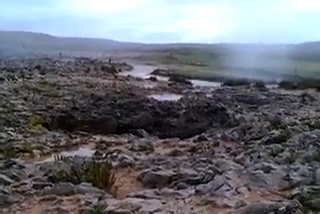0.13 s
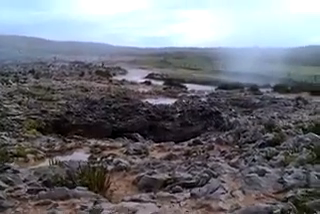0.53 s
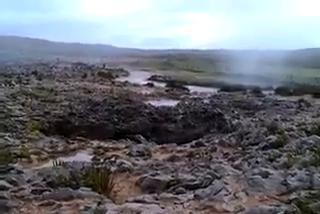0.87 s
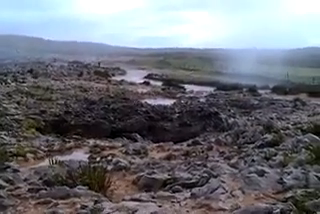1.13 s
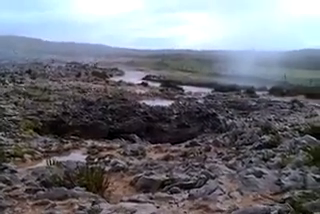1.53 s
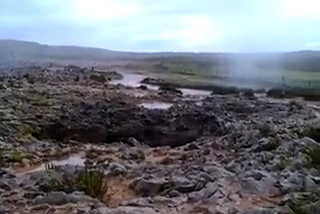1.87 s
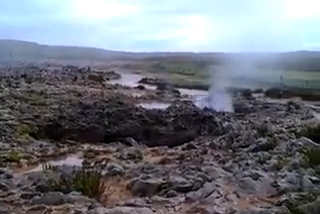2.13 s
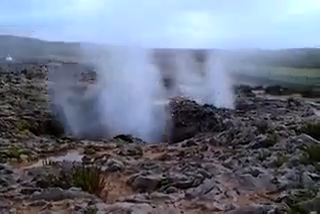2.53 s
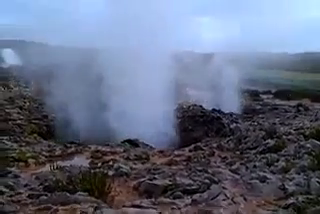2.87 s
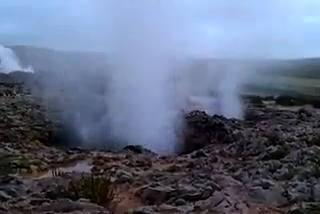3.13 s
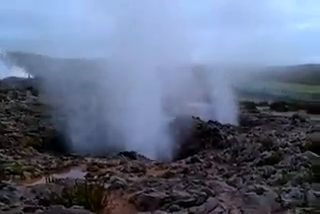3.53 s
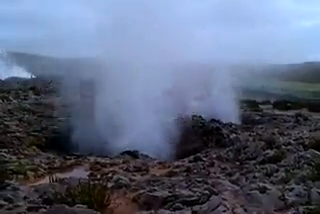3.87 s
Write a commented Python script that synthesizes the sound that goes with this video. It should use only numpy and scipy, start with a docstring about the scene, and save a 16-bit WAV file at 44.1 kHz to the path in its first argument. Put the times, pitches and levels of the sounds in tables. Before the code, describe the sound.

Low surf and wind, then spray bursts from rock blowholes with a roaring hiss.

```python
"""Distant surf washes steadily on a rocky coast, small waves slap and wind buffets the microphone.
A swell fills a cave under the rock: a deep rumble grows, and trapped air roars and booms in the throats
of the blowholes. Air and spray rush out in a loud turbulent hiss, coloured by its reflection off the
rock shelf. One mouth rings briefly, a cleft adds a narrow band of hiss, and the jets ease as the
swell sinks."""
import sys
import numpy as np
from scipy import signal
from scipy.fft import rfft, irfft
from scipy.io import wavfile

SR = 44100
rng = np.random.default_rng(int(sys.argv[2]) if len(sys.argv) > 2 else 0)


def put_to_file(sound):
    """Save the sound as 16-bit audio at rate SR, in the file named by the first command-line argument."""
    columns = np.atleast_2d(sound).T  # one column per channel
    safe = np.clip(columns, -1, 1)
    whole_steps = np.round(safe * 32767)
    wavfile.write(sys.argv[1], SR, whole_steps.astype(np.int16))


N = 176400
TIME = np.arange(N) / SR
FREQS = np.maximum(np.arange(N // 2 + 1) * SR / N, 1)

# envelope of the distant surf: time_s, relative_level_db
SURF_ENVELOPE = [(0.0, -47.5), (.7, -46), (1.15, -44.5), (1.35, -44), (1.5, -45.5), (1.8, -44.5),
                 (2.1, -43)]
# spectrum of the surf: frequency_hz, relative_gain_db
SURF_SPECTRUM = [(100, -0.5), (450, 0.5), (600, -0.5), (1050, 0.5), (1350, 0), (1800, 0.2), (2350, -2),
                 (3000, -6), (3800, -5.5), (5000, -8.5), (5650, -4), (6150, -8), (6700, -10), (7400, -18.5),
                 (8700, -25.5), (9600, -48), (15000, -61)]
# envelope of foam draining over the rocks: time_s, level_db
FOAM_ENVELOPE = [(0.0, -55.5), (.4, -55), (.65, -52.5), (1.08, -47.5), (1.45, -51), (1.8, -51),
                 (2.02, -47.5), (2.3, -50)]
# envelope of the wind on the microphone: time_s, relative_level_db
WIND_ENVELOPE = [(0.0, -43.5), (.26, -43.5), (.44, -44), (.6, -41.5), (.69, -40), (.79, -37.5), (.85, -46),
                 (.99, -37), (1.07, -42), (1.13, -38.5), (1.25, -39.5), (1.32, -34), (1.41, -35.5),
                 (1.51, -42.5), (1.62, -38), (1.75, -44.5)]
# spectrum of the wind: frequency_hz, relative_gain_db
WIND_SPECTRUM = [(20, -4), (50, -4.5), (100, -0.5), (150, -1), (220, -6.5), (300, -11.5), (420, -22.5),
                 (800, -49)]
# small waves slapping the rocks: centre_s, level_db
WAVE_SLAPS = [(.108, -42.5), (.247, -37.5), (.462, -43.5)]
# single eddies striking the microphone: centre_s, peak_db
EDDIES = [(.652, -31), (0.725, -21.5), (0.7953, -26.5), (1.127, -28.5), (1.315, -30), (1.6065, -25),
          (2.062, -27), (2.376, -17), (3.803, -19), (3.838, -26)]
# envelope of the swell's rumble in the cave: time_s, relative_level_db
RUMBLE_ENVELOPE = [(1.75, -37.5), (1.83, -36), (2.0, -34.5), (2.11, -35), (2.19, -27), (2.27, -30.5),
                   (2.38, -23), (2.46, -28.5), (2.75, -28.5), (3.02, -24.5), (3.22, -26), (3.35, -28.5),
                   (3.47, -27), (3.59, -28), (3.68, -26.5), (3.73, -28), (3.8, -24), (3.87, -29),
                   (4.0, -27)]
# spectrum of the rumble: frequency_hz, relative_gain_db
RUMBLE_SPECTRUM = [(20, -8.5), (40, -4), (65, 3.5), (85, -0.5), (108, 4), (130, -2.5), (175, -2.5),
                   (240, -11), (400, -34)]
# envelope of the roar in the throats of the holes: time_s, relative_level_db
THROAT_ENVELOPE = [(1.85, -46.5), (2.0, -37.5), (2.1, -37), (2.28, -32.5), (2.34, -27), (2.52, -24),
                   (2.68, -22.5), (2.82, -21), (2.92, -25.5), (3.2, -26.5), (3.47, -27), (3.6, -31.5),
                   (3.8, -29.5), (4.0, -39)]
# spectrum of the roar: nominal_frequency_hz, relative_gain_db
THROAT_SPECTRUM = [(90, -5.5), (150, -5), (200, -2.5), (255, 0), (310, -4.5), (385, -15), (480, -20),
                   (650, -37), (1200, -52)]
# envelope of the jets of air and spray: time_s, relative_level_db
JET_ENVELOPE = [(2.2, -47), (2.35, -36), (2.46, -32), (2.54, -29), (2.66, -29), (2.77, -28.3), (2.92, -30),
                (3.14, -30.3), (3.28, -32.5), (3.49, -32), (3.66, -38), (3.88, -43), (4.0, -40.5)]
# spectrum of the jets at full strength: frequency_hz, relative_gain_db
JET_SPECTRUM = [(200, -16), (480, -1), (600, -1), (750, 2), (1000, 0.5), (1350, -3), (1900, 1.8),
                (2700, 1.7), (3600, -0.5), (4600, -2), (5300, -2), (6400, -6.5), (8200, -8.5),
                (8700, -16.5), (9150, -29), (9900, -16.5), (11000, -16.5), (12800, -27.5), (15000, -47)]
# blasts of trapped air in the cave: centre_s, peak_db, pitch_hz
AIR_BLASTS = [(2.545, -17.5, 195.6), (2.595, -17, 250), (2.655, -15.5, 180.4), (2.732, -16.5, 255),
              (2.982, -23, 171.7), (3.46, -23.5, 195)]

SURF_TRIM_DB, WIND_TRIM_DB, RUMBLE_TRIM_DB, THROAT_TRIM_DB, JET_TRIM_DB = 4, 0.97, 0.2, -0.5, 0.96
CAVE_ONSET_DB_PER_S, JET_ONSET_DB_PER_S = 75, 320
TILT_PIVOT_HZ = 4030


def from_db(db):
    """Amplitude grows tenfold for every 20 dB."""
    return 10 ** (np.asarray(db) / 20)


def envelope_db(rows, onset_db_per_s=0):
    """Linear interpolation of level, with an optional rise up to the first point."""
    return np.interp(TIME, *np.transpose(rows)) - onset_db_per_s * np.maximum(rows[0][0] - TIME, 0)


def spectral_gain(spectrum):
    """A filter response interpolated in log frequency, rolling off beyond both ends."""
    hz, db = np.transpose(spectrum)
    skirts = 1 / np.sqrt((1 + (hz[0] / FREQS / 2) ** 4) * (1 + (FREQS / hz[-1] / 2) ** 4))
    return from_db(np.interp(np.log(FREQS), np.log(hz), db)) * skirts


def resonance(hz, half_width_hz):
    """The Lorentzian peak of a single resonance, as gain against frequency."""
    return 1 / (1 + ((FREQS - hz) / half_width_hz) ** 2)


def bursts(rows, sigma_s):
    """Superposed Gaussian envelopes, one for each (centre_s, level_db) row."""
    return sum(from_db(db) * np.exp(-.5 * ((TIME - centre_s) / sigma_s) ** 2) for centre_s, db in rows)


def filtered(source, gain):
    """Filtering multiplies the spectrum by a gain; the result is scaled to unit rms."""
    shaped = irfft(rfft(source) * gain, N)
    return shaped / np.sqrt(np.mean(shaped ** 2) + 1e-20)


def noise(gain):
    """White noise takes on the spectrum of its filter; unit rms."""
    return filtered(rng.standard_normal(N), gain)


def drift(rate_hz):
    """Low-pass noise gives a slow random fluctuation of unit rms."""
    return noise((FREQS > 3) / (1 + (FREQS / rate_hz) ** 2))


def turbulence(spectrum, flicker_db, surge_db, rate_hz, tilt_db_per_octave=0):
    """Amplitude modulation of noise: half-octave bands surge together and flicker separately."""
    carrier = rfft(noise(spectral_gain(spectrum)))
    common_db = surge_db * drift(rate_hz)
    band_position = np.maximum(2 * np.log2(FREQS / 20), 0)
    out = np.zeros(N)
    for k in range(int(2 * np.log2(spectrum[-1][0] / 20)) + 3):
        band = irfft(carrier * np.maximum(1 - abs(band_position - k), 0), N)
        octaves_above = max(np.log2(20 * 2 ** (k / 2) / TILT_PIVOT_HZ), 0)
        out += band * from_db(common_db + flicker_db * drift(rate_hz) + tilt_db_per_octave * octaves_above)
    return out


def surf():
    """Far breakers add incoherently to an even wash; draining foam adds a band of hiss."""
    wash = turbulence(SURF_SPECTRUM, flicker_db=0.33, surge_db=0.44, rate_hz=5.5)
    foam = noise(resonance(hz=5910, half_width_hz=860) ** 2)
    wash_gain = from_db(SURF_TRIM_DB + envelope_db(SURF_ENVELOPE))
    return wash_gain * wash + from_db(envelope_db(FOAM_ENVELOPE)) * foam


def wind():
    """Turbulent pressure fluctuations on the microphone make a lumpy low noise."""
    pressure = turbulence(WIND_SPECTRUM, flicker_db=0.3, surge_db=1.0, rate_hz=42)
    return from_db(WIND_TRIM_DB + envelope_db(WIND_ENVELOPE)) * pressure


def slaps():
    """The impact of a small wave on rock is a dull noise burst with a hollow resonance."""
    low_pass = 1 / np.hypot(1, (FREQS / 2600) ** 2)
    body = resonance(hz=520, half_width_hz=150)
    return bursts(WAVE_SLAPS, sigma_s=0.011) * noise(spectral_gain(SURF_SPECTRUM) * low_pass + body)


def buffets(sigma_s=0.0015):
    """Each strong eddy is a brief dip in pressure that thumps the microphone."""
    pressure = np.zeros(N)
    for centre_s, peak_db in EDDIES:
        offset_squared = ((TIME - centre_s) / sigma_s) ** 2
        pressure -= from_db(peak_db) * (1 - offset_squared) * np.exp(-offset_squared / 2)
    return pressure


def cave_rumble():
    """The swell excites the cave with noise that peaks at a few low frequencies."""
    rumble = turbulence(RUMBLE_SPECTRUM, flicker_db=-0.6, surge_db=-0.84, rate_hz=34)
    return from_db(RUMBLE_TRIM_DB + envelope_db(RUMBLE_ENVELOPE, CAVE_ONSET_DB_PER_S)) * rumble


def throat_roar(pitch_fall_per_db=0.0035, pivot_db=-25.5):
    """Turbulent flow roars in the throats; its spectrum shifts slightly down as it grows louder."""
    pitch_ratio = 1 - pitch_fall_per_db * (envelope_db(THROAT_ENVELOPE) - pivot_db)
    flow = turbulence(THROAT_SPECTRUM, flicker_db=0.2, surge_db=1.07, rate_hz=55)
    roar = np.interp(np.cumsum(pitch_ratio) / SR, TIME, flow, period=N / SR)
    return from_db(THROAT_TRIM_DB + envelope_db(THROAT_ENVELOPE, CAVE_ONSET_DB_PER_S)) * roar


def jets(dulling_db_per_octave_per_db=0.018, spray_db=-13.5, echo_s=0.001176, echo_gain=0.1):
    """Jet noise, brighter when stronger, interferes with its reflection off the rock shelf."""
    level_db = envelope_db(JET_ENVELOPE, JET_ONSET_DB_PER_S)
    tilt = dulling_db_per_octave_per_db * np.maximum(level_db - level_db.max(), -20)
    hiss = turbulence(JET_SPECTRUM, flicker_db=0.7, surge_db=0.5, rate_hz=19, tilt_db_per_octave=tilt)
    direct = from_db(JET_TRIM_DB + level_db) * (hiss + from_db(spray_db) * droplets())
    return direct + echo_gain * np.interp(TIME - echo_s, TIME, direct)


def droplets(drops_per_s=1900, spread_db=3, ring_cycles=1.7):
    """Spray strikes rock at random; each tick is a damped oscillation, 60 dB down after ring_cycles."""
    sizes = from_db(spread_db * np.minimum(rng.exponential(1, N), 4)) * rng.choice([-1, 1], N)
    impacts = sizes * (rng.random(N) < drops_per_s / SR)
    pitches_hz = np.geomspace(1500, 7500, num=16)
    pitch_index = rng.integers(0, len(pitches_hz), N)
    ticks = np.zeros(N)
    for k, hz in enumerate(pitches_hz):
        decay = np.exp(-np.log(1000) * hz / (ring_cycles * SR))
        angle = 2 * np.pi * hz / SR
        feedback = [1, -2 * decay * np.cos(angle), decay * decay]
        drive = impacts * (pitch_index == k) + 1e-18
        ticks += signal.lfilter([np.sin(angle), 0, -np.sin(angle)], feedback, drive)
    return filtered(ticks, spectral_gain(JET_SPECTRUM))


def booms(waver_share=0.139):
    """Each blast of trapped air is a short low tone under random frequency modulation."""
    warped_s = np.cumsum(1 + waver_share * drift(rate_hz=54)) / SR
    return sum(bursts([(centre_s, peak_db)], sigma_s=0.0091) * np.sin(2 * np.pi * pitch_hz * warped_s)
               for centre_s, peak_db, pitch_hz in AIR_BLASTS)


def howl(centre_s=2.87, level_db=-36):
    """A sharp resonance at the mouth of a hole sounds a brief hollow note at the height of the blow."""
    return bursts([(centre_s, level_db)], sigma_s=0.035) * noise(resonance(hz=760, half_width_hz=31))


def cleft(start_s=2.9, rise_s=0.6, db_per_jet_db=0.76):
    """Air in a narrow cleft makes narrow-band hiss, which fades less than the jets and is unmasked."""
    jet_db = envelope_db(JET_ENVELOPE, JET_ONSET_DB_PER_S)
    level_db = -37.5 + db_per_jet_db * (jet_db - jet_db.max())
    fade_in = np.clip((TIME - start_s) / rise_s, 0, 1)
    return fade_in * from_db(level_db) * noise(resonance(hz=5200, half_width_hz=350))


def scene():
    """Superposition: the pressures of all sources add at one microphone."""
    shore = surf() + wind() + slaps() + buffets()
    blowholes = cave_rumble() + throat_roar() + jets() + booms() + howl() + cleft()
    return (shore + blowholes)[None]


def record(dry):
    """An elliptic low-pass filter cuts the treble steeply above 15 kHz."""
    return signal.sosfilt(signal.ellip(10, .1, 80, 15000, fs=SR, output="sos"), dry)


dry = scene()
out = record(dry)
put_to_file(out)
```